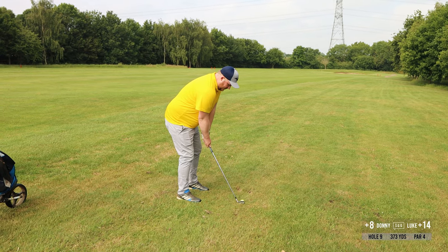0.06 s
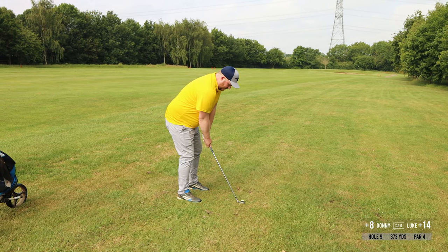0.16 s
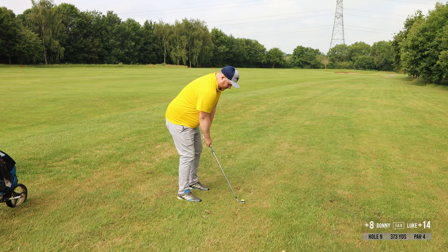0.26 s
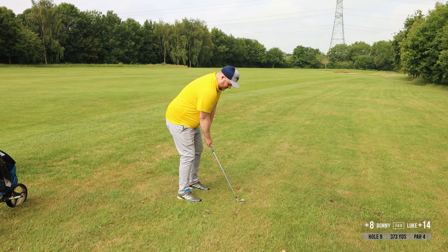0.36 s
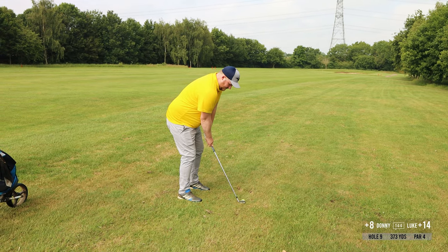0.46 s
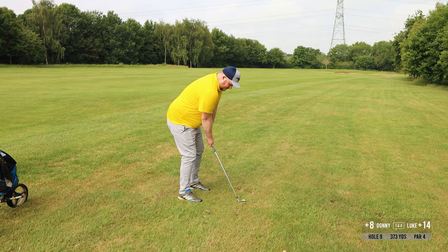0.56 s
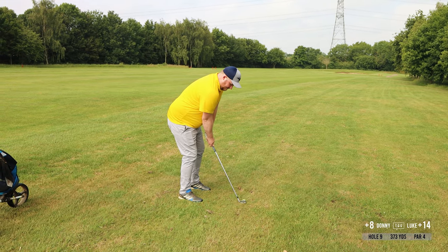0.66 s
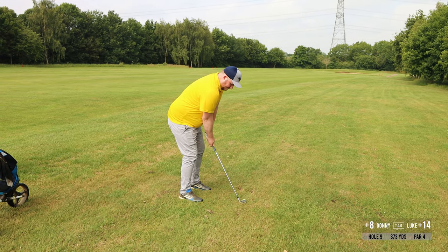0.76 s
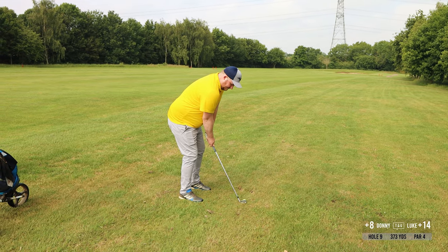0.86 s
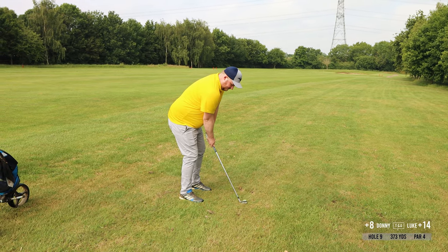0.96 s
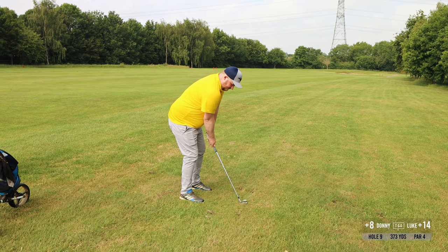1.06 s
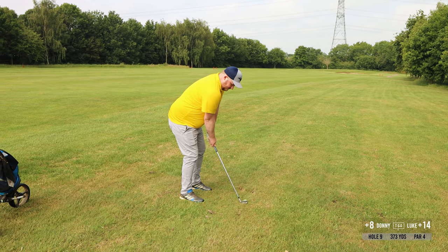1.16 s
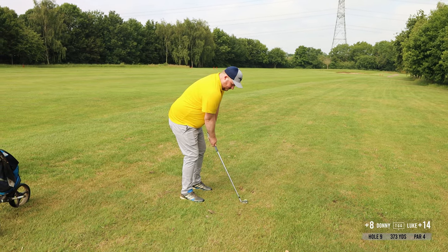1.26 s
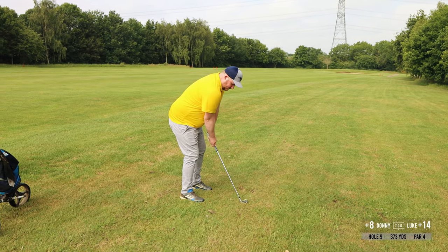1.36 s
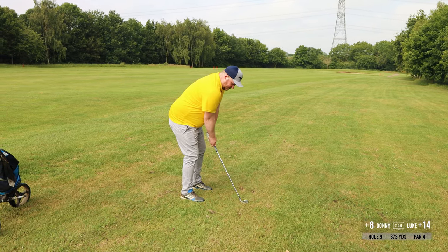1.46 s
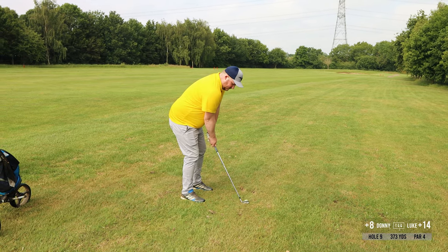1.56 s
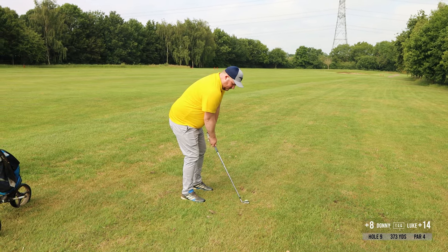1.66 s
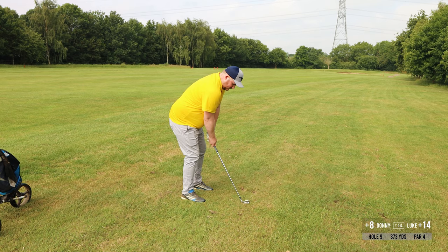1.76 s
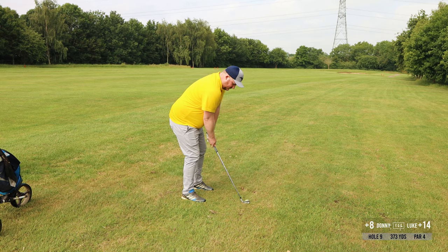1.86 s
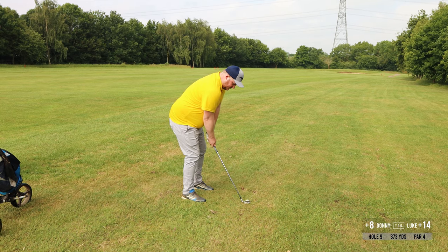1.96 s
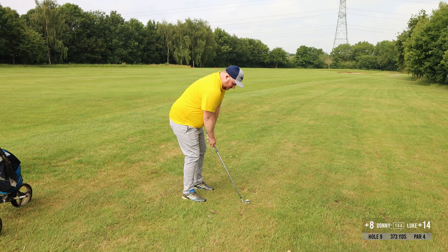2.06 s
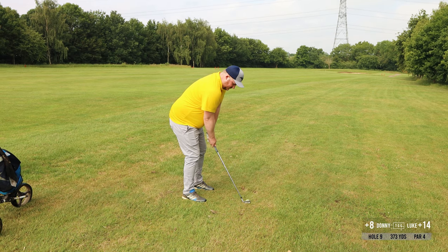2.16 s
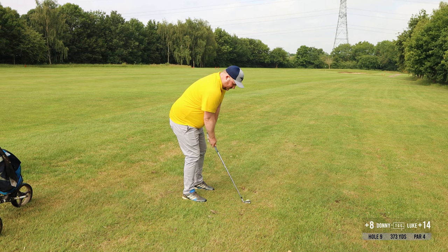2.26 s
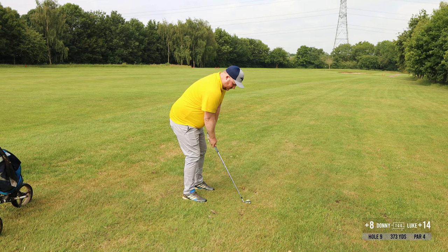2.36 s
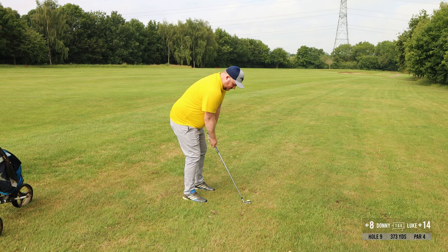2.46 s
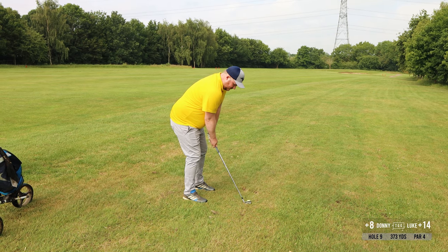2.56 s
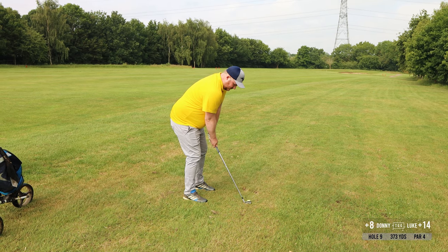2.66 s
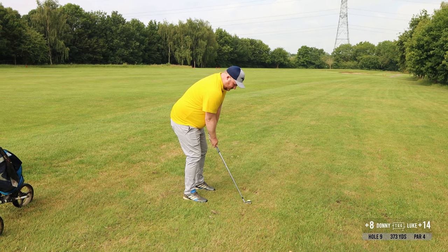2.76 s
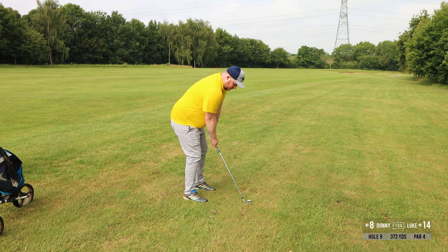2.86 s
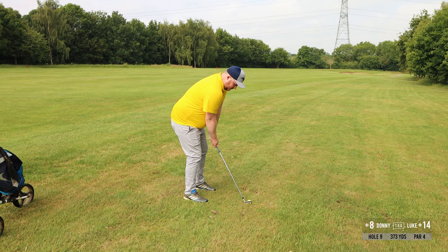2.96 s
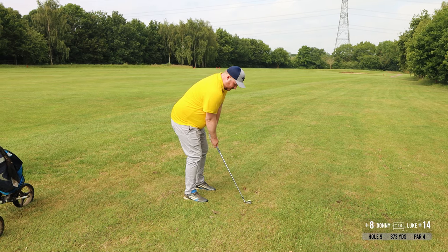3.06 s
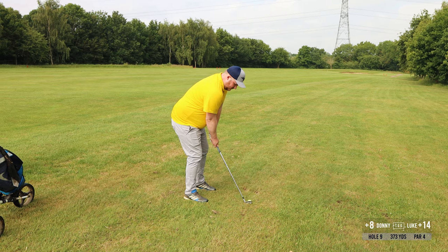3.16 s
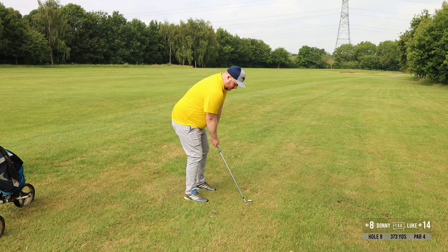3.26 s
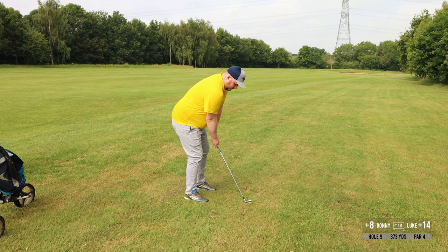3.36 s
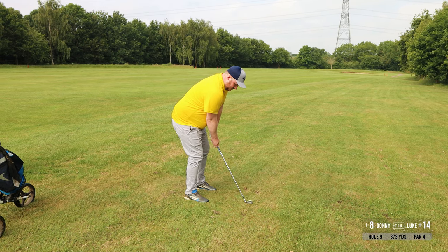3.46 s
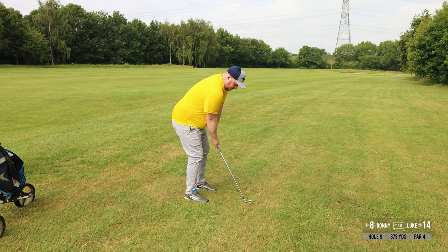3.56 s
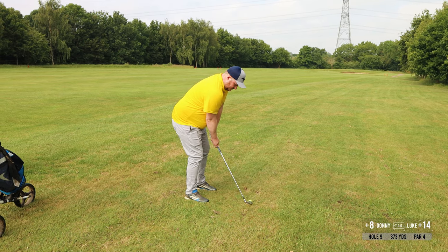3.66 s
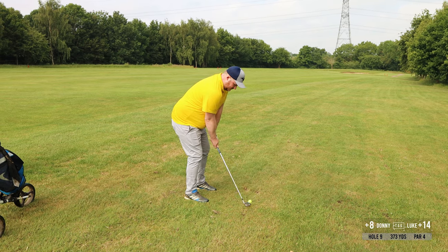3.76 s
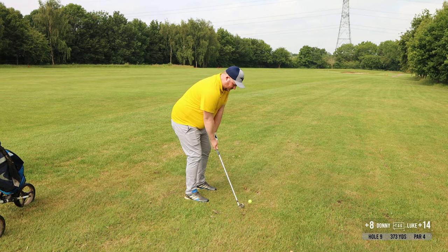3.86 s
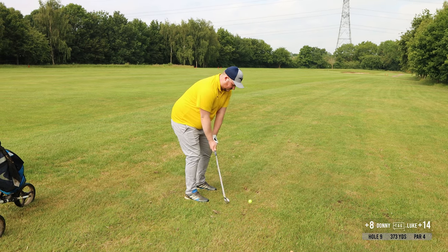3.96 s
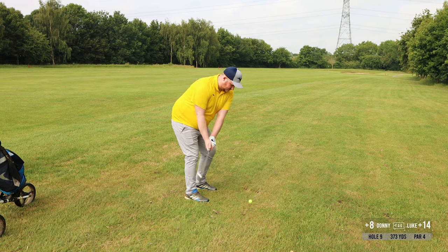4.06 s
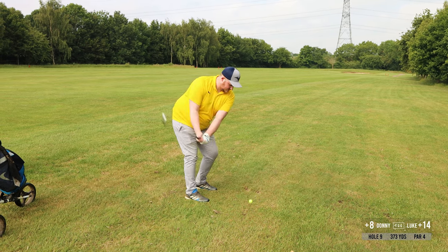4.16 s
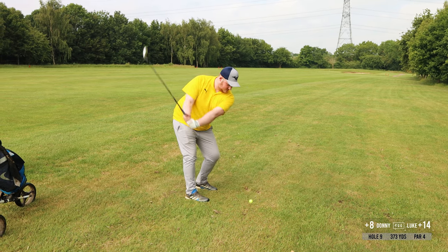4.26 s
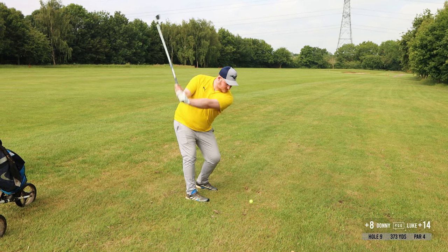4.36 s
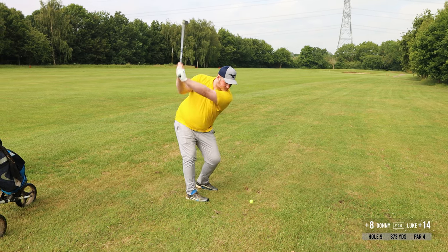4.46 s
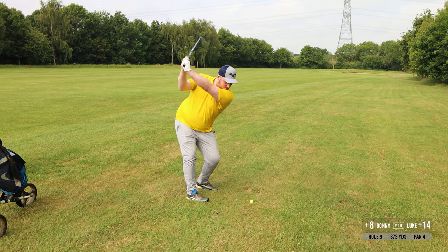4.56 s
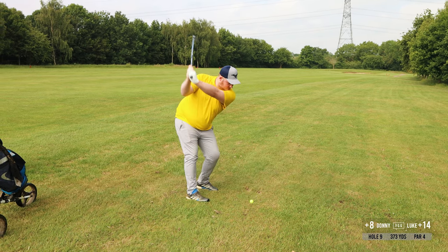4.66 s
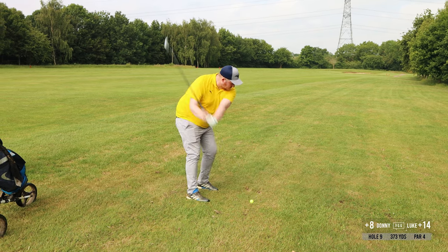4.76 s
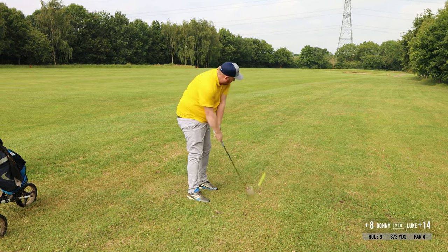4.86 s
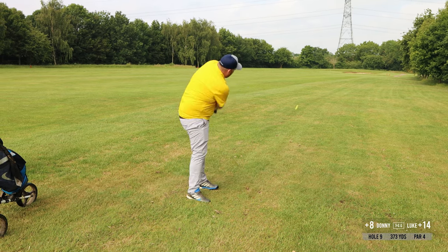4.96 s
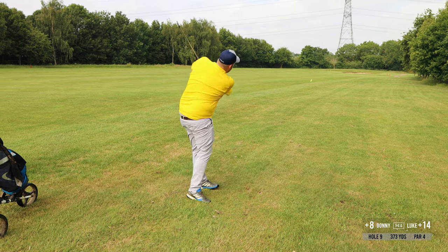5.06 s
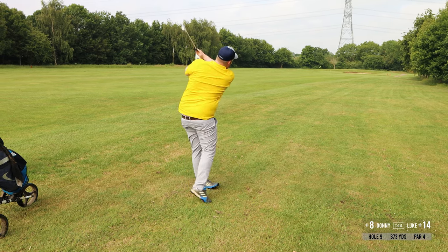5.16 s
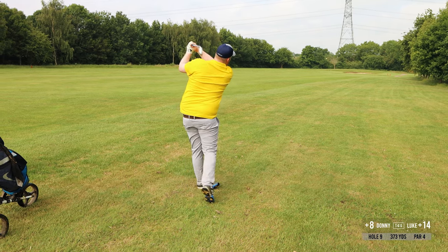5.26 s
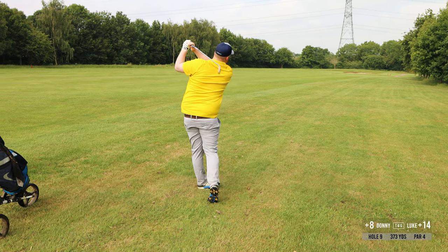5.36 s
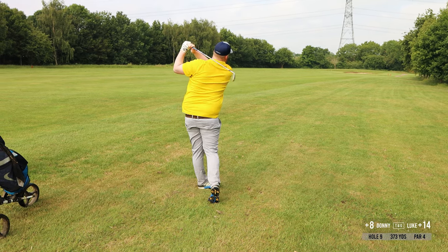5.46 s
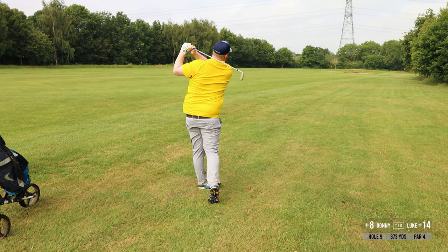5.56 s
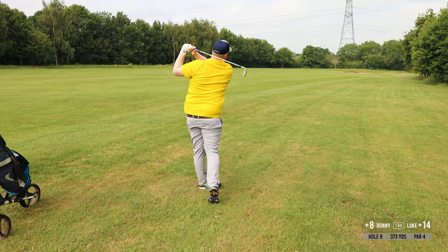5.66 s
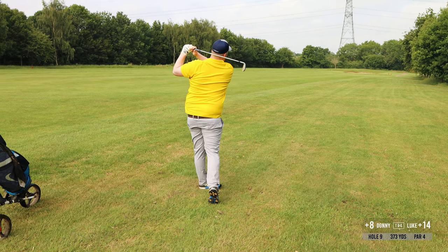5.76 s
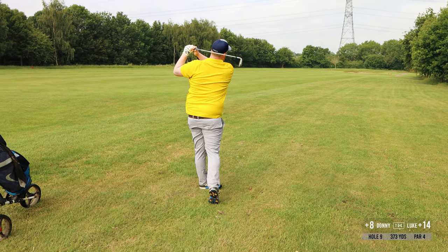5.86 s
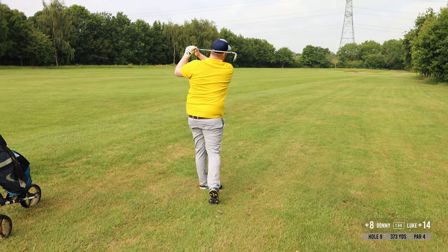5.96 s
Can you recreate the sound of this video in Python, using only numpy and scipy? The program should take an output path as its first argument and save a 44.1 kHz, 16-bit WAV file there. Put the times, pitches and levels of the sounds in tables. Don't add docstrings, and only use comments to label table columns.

```python
import sys
import numpy as np
from scipy import signal
from scipy.fft import rfft, irfft
from scipy.io import wavfile

SR = 44100
rng = np.random.default_rng(int(sys.argv[2]) if len(sys.argv) > 2 else 0)


def transcribe(u):
    v = np.clip(np.atleast_2d(u).T, -1, 1)
    q = np.round(v * 32767).astype(np.int16)
    wavfile.write(sys.argv[1], SR, q)


def boost_factor(decibels):
    exponent = np.asarray(decibels, float) / 20
    return 10 ** exponent


N = 265305
T = np.arange(N) / SR
STRIKE_S = 4.99376
FADE_DB = 40

# [f/Hz, level/dB]
AIR_SPECTRUM = [(12, -38.5), (20, 2.5), (70, -9.5), (104, -2), (319, -9), (780, -8.5), (1300, -13.5),
                (2260, -18), (3500, -18.5), (8600, -23), (9400, -24.5), (15000, -26)]
# [f/Hz, side minus middle/dB]
AIR_WIDTH = [(60, -55.5), (110, -47), (200, -28), (380, -22), (700, -25), (1290, -23), (2380, -15.5),
             (4400, -15), (8120, -12), (15000, -9)]
# [nearest t/s, gain/dB, pass length/s]
CARS = [
    (0.01, 3.5, 0.152),
    (1.054, 1.57, 0.385),
    (2.293, 1.5, 0.46),
    (5.9, 2, 0.87),
]
# [t/s, level/dB, attack/s, hold/s, release/s]
GUSTS = [
    (.3, -75.5, .8, 0.104, .6),
    (4.003, -67.5, 1.46, 0.453, 0.72),
    (4.987, -54, 0.117, .002, 0.08),
    (5.303, -73, 1.4, 0.57, .9),
]
# [start t/s, length/s, first f/Hz, last f/Hz, level/dB]
SWEEPS = [
    (.062, 0.0268, 4384, 3157, -60.5),
    (.091, .019, 3360, 1998, -67),
    (.111, 0.0147, 2587, 3850, -65),
    (.12, 0.02, 3860, 2840, -63),
    (.274, 0.041, 1934, 3750, -62.5),
    (.306, 0.0244, 3680, 3900, -62),
]
# [start t/s, length/s, first f/Hz, last f/Hz, level/dB]
BUZZES = [
    (0.001, 0.0693, 1715, 1594, -69.5),
    (.03, 0.0304, 4900, 5250, -66.5),
    (.052, .018, 5400, 4193, -62.5),
    (.206, 0.0187, 5160, 5040, -71.5),
    (.322, 0.0219, 4027, 2910, -63),
]
# [start t/s, length/s, first f/Hz, last f/Hz, level/dB]
SLIDES = [
    (.227, .043, 4600, 2080, -65.5),
    (.336, 0.081, 2740, 2343, -68),
    (.39, 0.115, 2312, 2125, -73),
]
# [start t/s, length/s, f/Hz, level/dB]
HELD_NOTES = [(0.688, 0.049, 3306, -76.5), (1.301, .045, 3404, -76), (1.826, 0.0275, 2700, -78),
              (2.068, .03, 4960, -79.5), (2.254, 0.06, 4897, -72), (2.36, 0.076, 4755, -70),
              (2.561, 0.111, 4844, -80.5), (2.57, .06, 5815, -81), (2.58, 0.068, 3480, -77.5),
              (2.637, .045, 8010, -78.5), (2.71, 0.095, 7780, -78.5), (2.7, 0.046, 4747, -77),
              (2.76, 0.037, 4760, -76.5), (2.8, 0.029, 4760, -76), (2.959, .06, 8580, -82),
              (5.657, 0.073, 2660, -74), (5.754, .095, 2575, -74), (5.822, 0.102, 2585, -72.5),
              (5.837, 0.07, 3215, -75)]
# [start t/s, length/s, first f/Hz, last f/Hz, level/dB]
GLIDES = [(.85, .04, 3124, 3300, -79.5), (1.1, 0.0274, 2780, 3185, -76), (1.137, 0.0424, 3450, 3267, -77.5),
          (1.27, .04, 2800, 3400, -73.5), (1.715, .08, 3186, 2738, -75.5), (1.984, 0.035, 3328, 3900, -74),
          (2.16, 0.058, 4944, 5096, -74.5), (2.165, .025, 3403, 3800, -75.5),
          (2.476, 0.076, 4875, 4710, -70), (5.595, 0.083, 1694, 1890, -72.5),
          (5.73, 0.041, 2068, 2205, -78), (5.925, .055, 2202, 2090, -75.5)]
# [start t/s, length/s, first f/Hz, last f/Hz, level/dB]
CHURRS = [
    (5.09, 0.0805, 4650, 4550, -71),
    (3.465, 0.093, 8400, 8200, -79.5),
    (3.55, 0.097, 3900, 3100, -75.5),
    (4.0, .06, 3650, 3600, -75),
    (4.33, 0.146, 8400, 8300, -77),
]
# [f/Hz, gain/dB]
MICROPHONE = [(6500, 0), (8600, 5), (9400, -9.5), (11000, -8), (14000, -6), (16000, -16)]
# [f/Hz, level/dB]
CLOTH_SPECTRUM = [(88, -31), (150, -8), (341, -7.5), (790, -0.5), (2000, -5), (3700, -8), (4600, -11.5),
                  (6000, -14.5), (16000, -15)]
# [t/s, level/dB, attack/s, hold/s, release/s]
GESTURES = [
    (3.801, -71, 0.1146, .01, 0.35),
    (4.248, -68.5, 0.386, 0.207, 1.06),
    (4.849, -69, 1.49, 0.057, .25),
    (5.121, -58.5, .12, 0.027, 1.075),
    (5.3, -66, 0.494, 0.154, 1.34),
]
# [t/s, peak/dB, f/Hz, ring-out (60 dB)/s]
CLUB_TOUCHES = [
    (4.9926, -13, 850, .004),
    (4.99367, 1, 6500, .0007),
    (4.99369, -10, 13000, .001),
]
# [t/s, peak/dB, f/Hz, ring-out (60 dB)/s]
TAPS = [(4.997, -42, 169.2, 0.09), (5.3082, -39.5, 13000, .001), (5.2957, -46.5, 11500, 0.00102),
        (5.5417, -49, 11500, .001), (5.241, -46, 894, 0.0114), (5.256, -45.5, 800, 0.0117),
        (5.265, -46.5, 8260, 0.0029), (5.2958, -33, 6000, 0.00095), (5.2959, -44.5, 8300, 0.0041),
        (5.3036, -31.5, 590, 0.01016), (5.3079, -26, 5960, 0.00074), (5.308, -40, 8180, 0.0049),
        (5.3124, -30.5, 1180, 0.00313), (5.398, -53, 7000, 0.00194), (5.4099, -36.5, 1230, 0.0056),
        (5.4146, -34.5, 1417, 0.0035), (5.437, -40.5, 12500, 0.00123), (5.4374, -45, 7500, 0.00158),
        (5.443, -39.5, 3000, 0.0021), (5.542, -48.5, 7000, 0.00097), (5.549, -45, 1200, 0.0041)]
# [f/Hz, level/dB]
WAKE_SPECTRUM = [(150, -6.5), (600, -6), (1080, -5), (1900, -6), (2600, -1.5), (3890, -8), (8390, -19),
                 (16000, -17)]
# [t/s, wake level/dB, attack/s, hold/s, release/s]
PASSES = [
    (4.981, -39.5, .125, 0.0056, 0.0226),
    (5.044, -47, .045, 0.0167, 0.128),
]
# [f/Hz, level/dB]
TURF_SPECTRUM = [(59, -31.5), (120, 3), (452, -5.5), (1130, -0.5), (2320, -2.5), (3320, -3.5), (6500, -9.5),
                 (16000, -5.5)]
# [f/Hz, level/dB, ring-out (60 dB)/s]
BALL_RINGS = [(695, -30.5, 0.021), (1322, -25.5, 0.0246), (1565, -25, 0.0245), (1857, -31, 0.0256),
              (2225, -20.5, 0.0222), (2700, -17.5, 0.017), (3660, -32.5, 0.0204), (4710, -29.5, 0.017),
              (5600, -17, 0.0096), (7640, -44.5, 0.0167)]
# [delay/s, level/dB]
BOUNCES = [
    (.0014, -22),
    (.0027, -24.5),
]


def unit(x):
    return x / np.sqrt(np.mean(x ** 2))


def colour(table, hz):
    f, db = np.transpose(table)
    return boost_factor(np.interp(np.log(hz + 1), np.log(f), db))


def noise(*tables, size=N):
    whole = 8192 * (size // 8192 + 1)
    hz = np.arange(whole // 2 + 1) * SR / whole
    gain = np.prod([colour(table, hz) for table in tables], axis=0)
    return irfft(rfft(rng.standard_normal(whole)) * gain, whole)[:size]


def wobble(hz, size):
    return unit(noise([(hz / 2, 0), (hz, -6), (10 * hz, -80)], size=size))


def span(table):
    s, *columns = np.transpose(table)
    cut = slice(int(s[0] * SR), min(int(s[-1] * SR), N))
    return cut, [np.interp(T[cut], s, column) for column in columns]


def gesture(s, db, attack, hold, release, sag_db=0.):
    attack, hold, release = np.array([attack, hold, release]) + 1e-4
    start_db = db - FADE_DB * min(1, s / attack)
    end_db = db - sag_db
    return [(max(s - attack, 0), start_db), (s, db), (s + hold, end_db),
            (s + hold + release, end_db - FADE_DB)]


def burst(table, *spectra, grain_db, grain_hz):
    out = np.zeros(N)
    cut, (db,) = span(table)
    grains = boost_factor(grain_db * wobble(grain_hz, len(db)))
    out[cut] = boost_factor(db) * unit(noise(*spectra, size=len(db)) * grains)
    return out


def add_ring(out, s, db, hz, t60, rise=0.):
    cut = slice(int(s * SR) + 1, int((s + t60) * SR) + 2)
    t = T[cut] - s
    swell = 1 - np.exp(-t * hz / rise) if rise else 1
    decay = np.exp(-np.log(1000) * t / t60)
    out[cut] += boost_factor(db) * swell * decay * np.sin(2 * np.pi * hz * t)


def tone(hz, rough, spread_hz):
    turn = np.exp(2j * np.pi * np.cumsum(hz) / SR)
    smear = (wobble(spread_hz, len(hz)) + 1j * wobble(spread_hz, len(hz))) / np.sqrt(2)
    blend = np.sqrt(1 - rough) + np.sqrt(rough) * smear
    return np.sqrt(2) * np.real(turn * blend)


def sing(rows, rough, spread_hz, edge, ease):
    out = np.zeros(N)
    for s, length, first, last, db in rows:
        cut, (part,) = span([(s, 1), (s + length, 0)])
        hz = last + (first - last) * part ** ease
        out[cut] += boost_factor(db) * signal.windows.tukey(len(hz), edge) * tone(hz, rough, spread_hz)
    return out


def lowpass(x, hz):
    return signal.sosfiltfilt(signal.ellip(8, .1, 40, hz, fs=SR, output="sos"), x)


def far_air():
    air_db, air_top_hz, traffic_db = -63.5, 15750, -0.43
    mid, side = noise(AIR_SPECTRUM), noise(AIR_SPECTRUM, AIR_WIDTH)
    gain = boost_factor(air_db) / np.std(mid)
    band = signal.butter(1, [200, 1600], "band", fs=SR, output="sos")
    traffic = signal.sosfiltfilt(band, mid)
    swell_db = traffic_db + sum(db * np.exp(-((T - s) / length) ** 2) for s, db, length in CARS)
    mid = mid + (boost_factor(swell_db) - 1) * traffic
    return lowpass(gain * np.array([mid + side, mid - side]), air_top_hz)


def breeze():
    breeze_db = -71.5
    wind = boost_factor(breeze_db)
    for gust in GUSTS:
        cut, (db,) = span(gesture(*gust))
        wind = wind + np.pad(boost_factor(db), (cut.start, N - cut.stop))
    low = [(15, -2.5), (50, 0.5), (110, -3.5), (300, -35)]  # f/Hz, level/dB
    return wind * burst([(0, 0), (N / SR, 0)], low, grain_db=2.5, grain_hz=9)


def birds():
    woods_t60_s, woods_db, near_in_woods_db = 0.47, -6, -5.5
    near = sing(SWEEPS, rough=.05, spread_hz=460, edge=0.305, ease=1.6)
    near += sing(BUZZES, rough=.75, spread_hz=670, edge=0.39, ease=1.4)
    near += sing(SLIDES, rough=0.73, spread_hz=364, edge=0.35, ease=1.5)
    held = [(s, length, hz, hz, db) for s, length, hz, db in HELD_NOTES]
    far = sing(held + GLIDES, rough=.12, spread_hz=91, edge=.55, ease=1.147)
    far += sing(CHURRS, rough=1.0, spread_hz=360, edge=0.57, ease=1.5)
    t = T[:SR // 2]
    woods = rng.standard_normal(len(t)) * np.exp(-np.log(1000) * t / woods_t60_s)
    woods /= np.linalg.norm(woods)
    echo = signal.oaconvolve(far + boost_factor(near_in_woods_db) * near, woods)[:N]
    return near + far + boost_factor(woods_db) * echo


def clothes():
    return sum(burst(gesture(*row), CLOTH_SPECTRUM, MICROPHONE, grain_db=1.75, grain_hz=148.9)
               for row in GESTURES)


def taps():
    out = np.zeros(N)
    for s, db, hz, t60 in CLUB_TOUCHES + TAPS:
        add_ring(out, s, db, hz, t60, rise=0.233)
    return -out


def club_wake():
    split_hz, bright_share = 4200, .8
    dull = [(split_hz / 2, 0), (split_hz * 2, -20)]
    bright = [(split_hz / 2, -20), (split_hz, 0)]
    out = np.zeros(N)
    for s, db, attack, hold, release in PASSES:
        dull_curve = gesture(s, db - 2.5, attack, hold, release)
        bright_curve = gesture(s, db - 4.5, bright_share * attack, hold, bright_share * release)
        out += burst(dull_curve, WAKE_SPECTRUM, dull, grain_db=-0.2, grain_hz=300)
        out += burst(bright_curve, WAKE_SPECTRUM, MICROPHONE, bright, grain_db=1.15, grain_hz=400)
    return out


def shaft_whistle():
    top_hz, sag_hz_per_s = 640, 3400
    loudest_s, whistle_db, fade_s = 4.967, -43.5, 0.093
    out = np.zeros(N)
    cut = slice(int(4.85 * SR), int(5.08 * SR))
    hz = top_hz - sag_hz_per_s * np.abs(T[cut] - STRIKE_S)
    whistle = tone(hz, rough=0.87, spread_hz=284)
    whistle += boost_factor(-8.5) * tone(2 * hz, rough=1, spread_hz=460)
    away_s = T[cut] - loudest_s
    away_s = np.where(away_s > 0, 1.4, 1) * away_s
    out[cut] = boost_factor(whistle_db - FADE_DB * (away_s / fade_s) ** 2) * whistle
    return out


def turf_tear():
    curve = gesture(4.9958, -25.5, attack=.004, hold=.016, release=.007, sag_db=17)
    return burst(curve, TURF_SPECTRUM, MICROPHONE, grain_db=1.2, grain_hz=900)


def ball_strike():
    contact_s, squeeze_db = .0007, 7
    contact = np.clip((T - STRIKE_S) / contact_s, 0, 1)
    crack = boost_factor(squeeze_db) * np.sin(2 * np.pi * contact)
    out = crack.copy()
    for delay, db in BOUNCES:
        out += boost_factor(db) * np.interp(T - delay, T, crack)
    for hz, db, t60 in BALL_RINGS:
        add_ring(out, STRIKE_S, db, hz, t60)
    return out


def scene():
    background = far_air() + breeze()
    swing = clothes() + club_wake() + shaft_whistle()
    hit = taps() + turf_tear() + ball_strike()
    return background + birds() + swing + hit


def low_pass(x):
    return signal.sosfilt(signal.butter(12, 16650, fs=SR, output="sos"), x)


def record(dry):
    ceiling, top_hz = .315, 16000
    clipped = np.clip(dry, -ceiling, ceiling)
    mix = lowpass(clipped, top_hz)
    return low_pass(mix)


dry = scene()
out = record(dry)
transcribe(out)
```